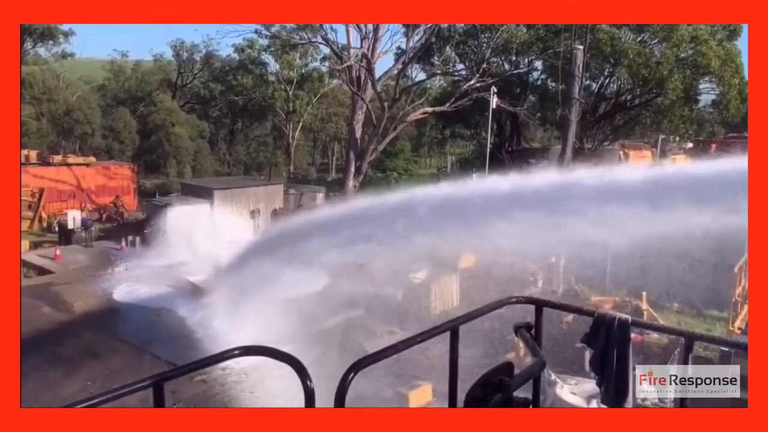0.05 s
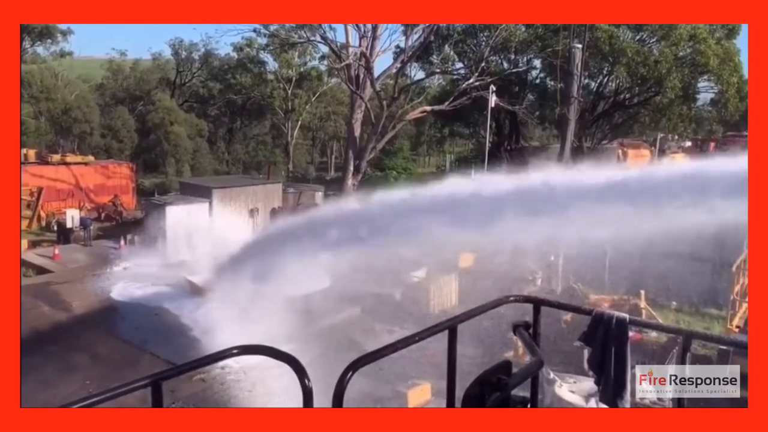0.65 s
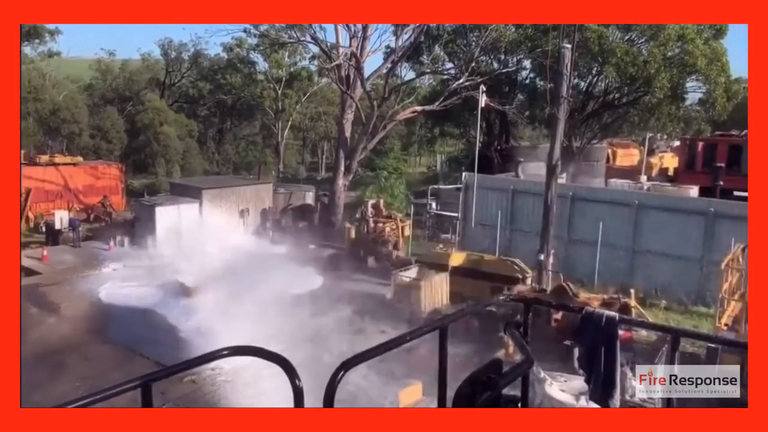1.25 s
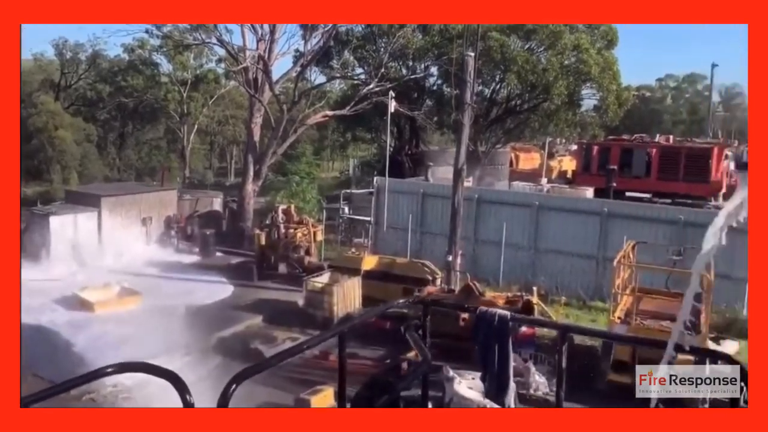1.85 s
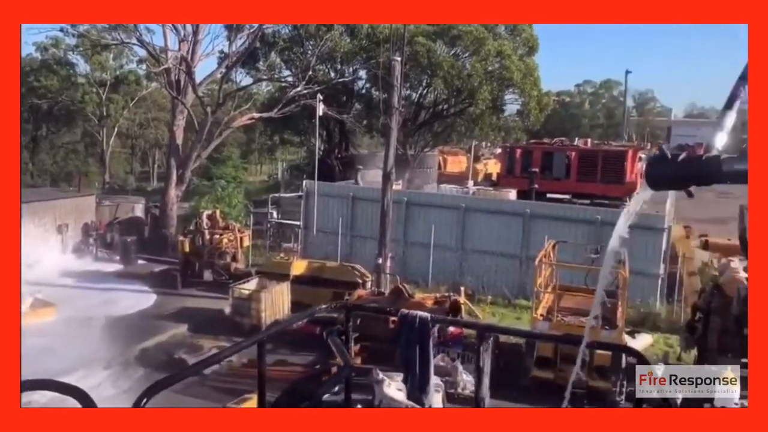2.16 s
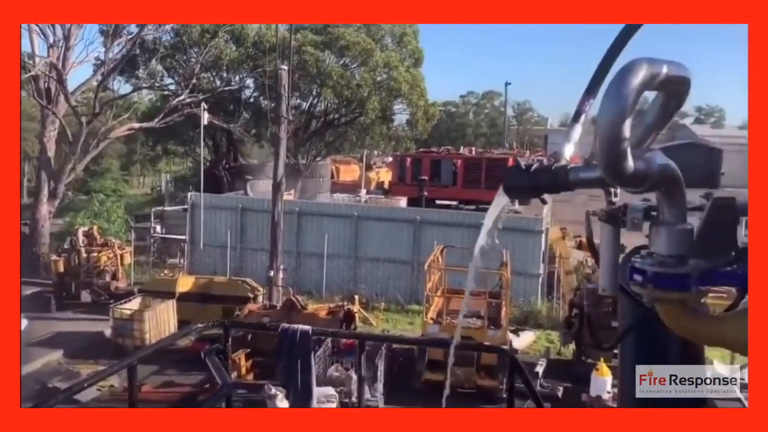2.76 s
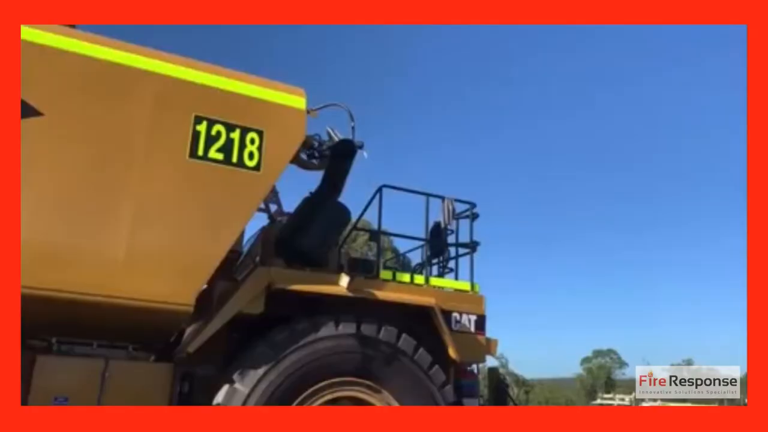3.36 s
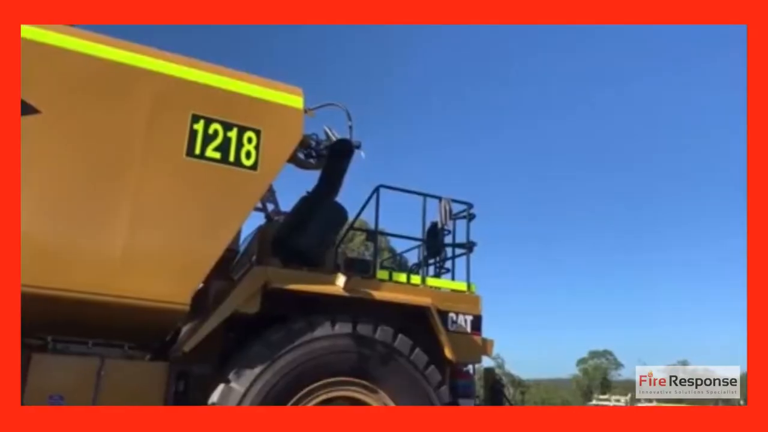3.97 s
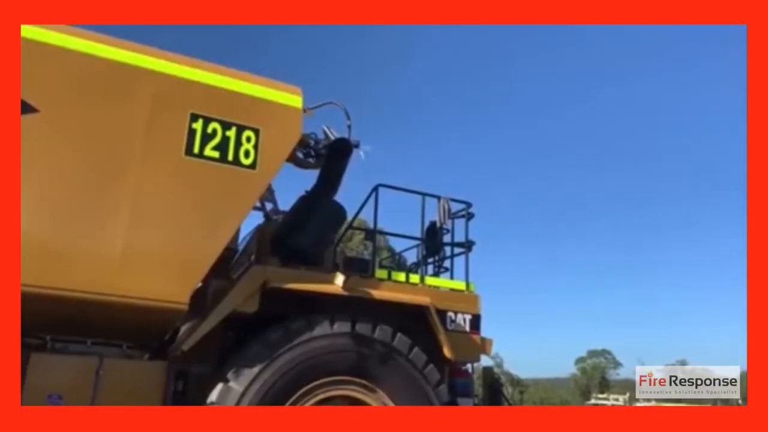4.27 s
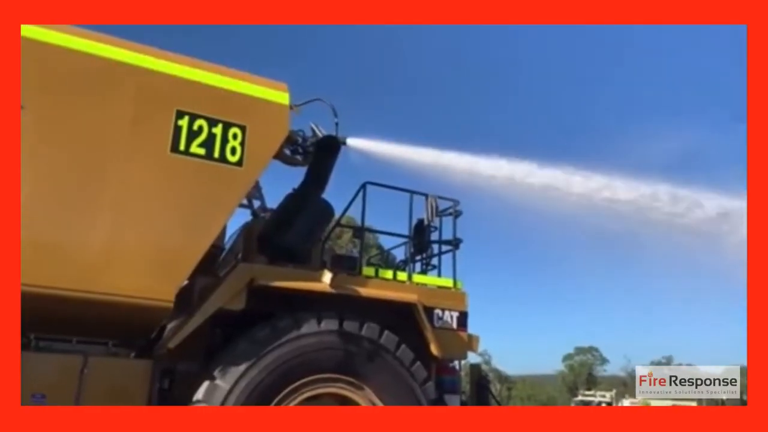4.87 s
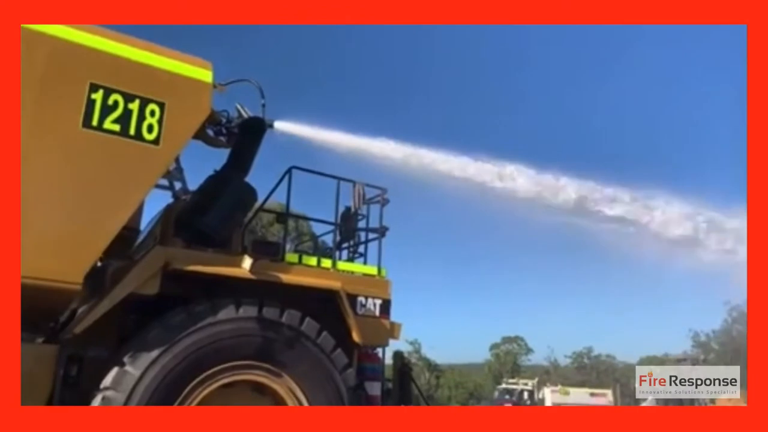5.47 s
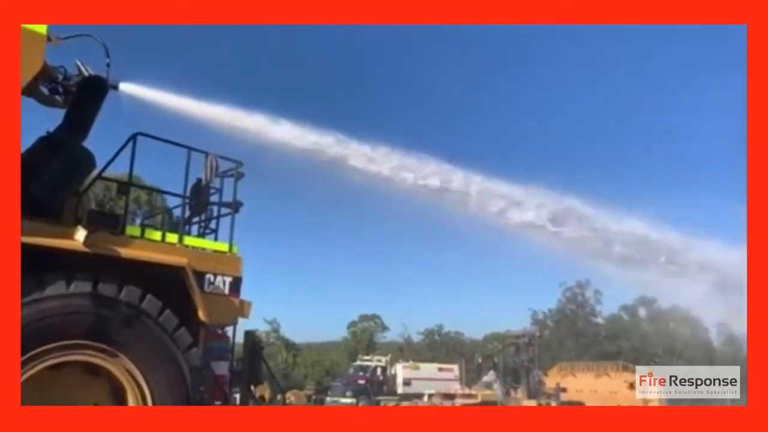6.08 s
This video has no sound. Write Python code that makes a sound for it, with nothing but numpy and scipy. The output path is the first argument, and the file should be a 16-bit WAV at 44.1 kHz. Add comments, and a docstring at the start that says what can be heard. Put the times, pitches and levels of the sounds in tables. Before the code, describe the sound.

A heavy diesel truck roars as its water cannon hisses, spits and dribbles away; after a break, the clattering engine runs and the jet restarts.

```python
"""A big diesel water truck works its cannon. Its exhaust drones at harmonics of the engine cycle,
combustion roars, and gear tones howl through the resonances of their case. Heard from the deck, the jet
hisses as it tears into drops, stops and spits air; the spray falls and thins to a dribble while the
engine winds down. After a brief break the truck is heard from the ground at full speed, clattering and
whistling; the valve opens, the pump takes load, slugs of water burst out and the jet starts again."""
import sys
import numpy as np
from scipy import signal
from scipy.fft import rfft, irfft
from scipy.io import wavfile
from scipy.ndimage import uniform_filter1d

SR = 44100
rng = np.random.default_rng(int(sys.argv[2]) if len(sys.argv) > 2 else 0)


def wav_record(signal):
    """Record a signal, one row per channel, as 16-bit PCM in the file named by sys.argv[1]."""
    frames = np.transpose(np.atleast_2d(signal))
    bounded = np.clip(frames, -1, 1)
    # unit amplitude maps onto the largest positive 16-bit level
    quanta = np.round(bounded * 32767).astype(np.int16)
    wavfile.write(sys.argv[1], SR, quanta)


N = 269451
TIME, BINS = np.arange(N) / SR, np.fft.rfftfreq(N, 1 / SR)

# engine tones, mostly exhaust harmonics, with gear whines at 42 and 77: (multiple of the cycle rate, relative
# level on deck [dB], on the ground [dB])
ENGINE_TONES = [(4, -23.3, -29.5), (5, -35.5, -38), (6, -30.5, -40), (7, -38.5, -44), (8, -33.5, -48),
                (9, -40, -35), (10, -36.5, -40), (11, -34.5, -42), (12, -27.5, -27.3), (13, -29, -30),
                (14, -22, -18.9), (15, -38, -39), (16, -36, -39), (17, -32, -42), (18, -34.5, -46),
                (20, -39.5, -50), (21, -45, -38), (25, -39.5, -50), (40, -38, -48), (42, -34, -37),
                (77, -34, -55)]
# spectrum of the roar as the engine winds down: (frequency [Hz], relative density [dB])
COASTING_SPECTRUM = [(25, -22), (55, -4), (120, -9), (155, 12), (200, -7), (235, 5), (300, -9.5), (620, -7),
                     (950, -10.5), (1300, -15.5), (1750, -17.5), (2800, -24.5), (5000, -45), (12000, -46.5)]
# stereo balance at each place: (frequency [Hz], left minus right [dB])
DECK_BALANCE = [(60, -5), (150, -4), (380, -7.5), (950, -2), (2380, 0), (5980, -1), (15000, 1)]
GROUND_BALANCE = [(60, -4.5), (150, -3.5), (380, 0), (950, 0.5), (2380, -1.5), (5980, -2), (15000, 1.5)]
# stereo coherence at each place: lead of the left side [s], then (frequency [Hz], correlation [0-1])
DECK_COHERENCE = (-.00023, [(60, 1), (260, 0.34), (500, 0.049), (1000, 0.87), (2000, 0.5), (4000, 0.26),
                  (9000, 0.023)])
GROUND_COHERENCE = (0.00013, [(60, .97), (260, 0.65), (500, 0.55), (1000, 0.93), (2000, 0.74), (4000, 0.21),
                    (8000, 0.51), (15000, 0.024)])
# the listener turns from the engine toward the jet: (time [s], share of the turn [0-1])
TURN_TO_JET = [(5.25, 0.12), (5.85, 0.57)]
DECK, GROUND = (DECK_COHERENCE, DECK_BALANCE), (GROUND_COHERENCE, GROUND_BALANCE)
THROTTLE_OFF_S, PUMP_LOAD_S = 1.31, 4.25
CYLINDERS = 12


def gain_of(db):
    """Amplitude ratio: a factor of ten for every 20 dB."""
    return 10 ** (np.asarray(db) / 20)


def unit_rms(x):
    """Normalisation to a mean power of 1."""
    return x / np.sqrt(np.mean(x ** 2) + 1e-20)


def curve(rows):
    """Linear interpolation of a time table at every sample."""
    return np.interp(TIME, *np.transpose(rows))


def at_frequency(rows, hz):
    """Interpolation of a spectrum table on a logarithmic frequency axis."""
    row_hz, value = np.transpose(rows)
    return np.interp(np.log(hz + 1), np.log(row_hz + 1), value)


def settle(start_s, time_s):
    """First-order relaxation from 0 to 1 with time constant time_s."""
    return 1 - np.exp(-np.maximum(TIME - start_s, 0) / time_s)


def bursts(rows):
    """Envelope of transients with exponential rise and decay."""
    return sum(gain_of(db) * np.exp(-abs(TIME - peak_s) / np.where(TIME < peak_s, rise_s, decay_s))
               for peak_s, db, rise_s, decay_s in rows)


def drift(hz):
    """Random fluctuation of rms 1: noise low-passed at hz."""
    return unit_rms(irfft(rfft(rng.standard_normal(N)) / (1 + (BINS / hz) ** 4), N))


def pan(balance, hz):
    """Constant-power panning: left and right gains at each frequency."""
    pair = gain_of(np.array([.5, -.5])[:, None] * at_frequency(balance, np.atleast_1d(hz)))
    return pair / np.sqrt(np.mean(pair ** 2, 0))


def coloured(white_pair, spectrum, place, band_hz=(0, SR)):
    """Spectral shaping to about rms 1 within the band; mid-side mixing sets the stereo coherence."""
    (lead_s, coherence), balance = place
    first, second = rfft(white_pair)
    correlation = np.clip(at_frequency(coherence, BINS), -.99, .99)
    mid, side = first * np.sqrt((1 + correlation) / 2), second * np.sqrt((1 - correlation) / 2)
    colour = gain_of(at_frequency(spectrum, BINS))
    colour /= np.sqrt(np.mean(colour ** 2 * (BINS > band_hz[0]) * (BINS < band_hz[1])))
    delay = np.exp(-2j * np.pi * BINS * lead_s)
    return irfft(np.array([mid + side, (mid - side) * delay]) * colour * pan(balance, BINS), N)


def crank(cycle_hz, hunting=.0006):
    """Phase as the integral of speed, in four-stroke cycles; the governor lets the speed hunt slightly."""
    return np.cumsum(cycle_hz * (1 + hunting * drift(5.5))) / SR


def tones(multiples, levels_db, cycles, balance, lead_s, waver, waver_hz, in_step=()):
    """Partials phase-locked to the crank; moving air modulates their amplitude and phase."""
    out, mean_cycle_hz = np.zeros((2, N)), (cycles[-1] - cycles[0]) * SR / N
    wobble = drift(waver_hz) + 1j * drift(waver_hz)
    for multiple, db in zip(multiples, levels_db):
        hz = multiple * mean_cycle_hz
        depth = waver * np.sqrt(hz / 500)  # short waves are disturbed more
        amplitude = gain_of(db) / np.sqrt(.5 + depth ** 2)
        start = rng.random() * (multiple not in in_step)  # harmonics in step add up to a chug
        modulation = 1 + depth * np.roll(wobble, rng.integers(N))
        partial = amplitude * np.exp(2j * np.pi * (multiple * cycles + start)) * modulation
        stereo = pan(balance, hz)[:, 0] * np.exp(1j * np.pi * hz * lead_s * np.array([1, -1]))
        out += (stereo[:, None] * partial).real
    return out


def deck_exhaust(cycles, cycle_hz, release):
    """Periodic firing makes a harmonic series, which slides through the pipe's resonances as it slows."""
    # resonant response of the exhaust pipe: (frequency [Hz], relative level [dB])
    pipe_response = [(42, -35), (60, -48), (82, -29), (134, -61), (151, -25), (168, -30), (185, -46),
                     (208, -44), (230, -25), (260, -44)]
    multiples, levels_db, _ = np.transpose(ENGINE_TONES)
    pulling = tones(multiples, levels_db, cycles, DECK_BALANCE,
                    lead_s=-.0001, waver=.13, waver_hz=4, in_step=(12, 14, 16))
    harmonics = np.arange(4, 27)
    sliding_db = (at_frequency(pipe_response, multiple * cycle_hz) for multiple in harmonics)
    coasting = tones(harmonics, sliding_db, cycles, DECK_BALANCE,
                     lead_s=-.0001, waver=.15, waver_hz=4, in_step=range(12, 18))
    return gain_of(-1) * pulling * (1 - release) + gain_of(-2.9) * coasting * settle(THROTTLE_OFF_S, .15)


def combustion(cycles, repeating_share, unevenness, size=4096):
    """Cyclostationary noise: unequal cylinders pulse a mix of a repeating pattern and fresh gas noise."""
    phase = cycles % 1
    pattern = signal.resample(rng.standard_normal((2, size)), 4 * size, axis=1)
    repeating = np.sqrt(repeating_share) * pattern[:, (phase * 4 * size).astype(int)]
    strength = np.exp(unevenness * rng.standard_normal(CYLINDERS))[(phase * CYLINDERS).astype(int)]
    puffs = strength * (1 + unevenness * np.cos(2 * np.pi * CYLINDERS * cycles))
    fresh = np.sqrt(1 - repeating_share) * rng.standard_normal((2, N))
    return unit_rms(puffs * (repeating + fresh))


def deck_roar(cycles, release, working_db=-21, coasting_db=-29.5):
    """Source and filter: combustion noise changes colour and weakens as the throttle eases off."""
    # spectrum of the roar under load: (frequency [Hz], relative density [dB])
    working_spectrum = [(25, -13), (50, -4), (125, -4), (170, 2.5), (235, 4.5), (300, -1.5), (430, -2),
                        (630, 4), (750, -5.5), (860, -1), (1600, -10), (2400, -14), (5000, -32.5),
                        (12000, -53)]
    drive = combustion(cycles, repeating_share=.44, unevenness=.17)
    working = coloured(drive, working_spectrum, DECK, band_hz=(400, 2500))
    coasting = coloured(drive, COASTING_SPECTRUM, DECK, band_hz=(400, 2500))
    level_db = working_db + (coasting_db - working_db) * settle(1.19, .58)
    return gain_of(level_db) * (working * (1 - release) + coasting * release)


def gear_case_db(hz, floor_db=-14):
    """Modal response of the gear case: its resonances add in power above a floor."""
    # modes of the case: (frequency [Hz], width [Hz], peak gain [dB])
    modes = [(112, 19, 1.5), (158, 16, -23), (216, 44, -1), (270, 18, -5), (331.3, 12, 0),
             (365.2, 11.3, 3.5), (410, 6.1, 2), (452, 21, 2.5), (533.6, 7.1, 0.5), (616, 66, 0),
             (1467, 52, -1.5), (1780, 41, -5), (2040, 150, -8)]
    power = sum(gain_of(db) ** 2 / (1 + ((hz - mode_hz) / width) ** 2) ** 2 for mode_hz, width, db in modes)
    return 10 * np.log10(gain_of(floor_db) ** 2 + power)


def gear_howl(cycles, cycle_hz, release, backlash_cycles=.0009):
    """Resonance swells each gear tone in turn as it slows; unloaded, backlash lets the teeth rattle."""
    # gear tones: (multiple of the cycle rate, relative level under load [dB], change when coasting [dB])
    gears = [(8.65, -31, -1), (16.8, -27, -7), (17.3, -36, 6), (23.6, -33, -4), (25.95, -32, 1),
             (33.6, -29.5, -2), (34.6, -41, 5), (43.25, -34.5, -6), (46, -43, 0), (49.5, -44, 5),
             (50.4, -36, 5), (51.4, -44, 7), (52.4, -44, 4), (154, -37, 2), (184.3, -42, 2)]
    shake = drift(hz=16)
    levels_db = []
    for multiple, db, change_db in gears:
        shake_db = 3.5 * (np.roll(shake, rng.integers(N)) - .4)
        levels_db.append(db + gear_case_db(multiple * cycle_hz) + release * (change_db + shake_db))
    rattling = cycles + backlash_cycles * release * drift(hz=22)
    return tones([row[0] for row in gears], levels_db, rattling, DECK_BALANCE,
                 lead_s=-.0001, waver=.15 + .3 * release, waver_hz=9)


def deck_engine(full_hz=13.685, cut_s=1.37, drop_hz=.75, coast_hz_per_s=2.3):
    """Frictional run-down: with the throttle cut, the speed drops quickly, then falls at a steady rate."""
    cycle_hz = full_hz - drop_hz * settle(cut_s, .3) - coast_hz_per_s * np.maximum(TIME - cut_s, 0)
    cycles, release = crank(cycle_hz), settle(THROTTLE_OFF_S, .24)
    return (deck_exhaust(cycles, cycle_hz, release) + deck_roar(cycles, release)
            + gain_of(-1.1) * gear_howl(cycles, cycle_hz, release))


def droplets(per_s, spread_db, drop_gain, flutter_db, size=256):
    """Shot noise of separate drops in a white hiss of mist, fluttering in patches of time and frequency."""
    sizes = gain_of(spread_db * np.minimum(rng.exponential(1, (2, N)), 4))
    drops = unit_rms(sizes * rng.standard_normal((2, N)) * (rng.random((2, N)) < per_s / SR))
    mist = rng.standard_normal((2, N))
    hz, _, bands = signal.stft(mist + drop_gain * drops, SR, nperseg=size)
    patches = uniform_filter1d(rng.standard_normal(bands.shape[1:]), 5, axis=0)
    patches = unit_rms(uniform_filter1d(patches, 10, axis=1))
    depth_db = flutter_db + 3 * np.minimum(hz / 9000, 1)[:, None] ** 2  # the finest spray is most fitful
    return unit_rms(signal.istft(bands * gain_of(depth_db * patches), nperseg=size)[1][:, :N])


def deck_jet(level_db=-31, shut_s=.7):
    """Jet break-up: water tearing into drops hisses until the valve shuts."""
    # spectrum of the jet close by: (frequency [Hz], relative density [dB])
    jet_spectrum = [(500, -18), (2000, 1), (4500, -12), (6000, -4), (8200, -1.5), (10500, -8.5),
                    (15500, -10)]
    hiss = droplets(per_s=1700, spread_db=3, drop_gain=.81, flutter_db=1)
    return gain_of(level_db) * (1 - settle(shut_s, .056)) * coloured(hiss, jet_spectrum, DECK)


def splatter(per_s, spread_db, top_hz, pitches=16, size=256):
    """Random impacts: each blob of water slaps the deck with a damped oscillation, left or right."""
    out = np.zeros((2, N))
    for hz in np.geomspace(1500, top_hz, pitches):
        periods = hz * np.arange(size) / SR
        slap = periods * np.exp(-periods / 9.3) * np.sin(2 * np.pi * periods)
        hits = rng.random((2, N)) < per_s / pitches / SR
        strengths = gain_of(spread_db * np.minimum(rng.exponential(1, (2, N)), 3))
        out += signal.oaconvolve(hits * strengths, slap[None], axes=1)[:, :N]
    return unit_rms(out)


def falling_spray(spray_db=-33.5, dribble_db=-40):
    """Impact noise: spray keeps landing after the jet stops, slops briefly and thins to a dribble."""
    # spectrum of the landing spray: (frequency [Hz], relative density [dB])
    spray_spectrum = [(500, -25), (2500, 6), (4500, 11), (6200, 6.5), (8300, 6), (11000, -8.5),
                      (15500, -13)]
    patter = coloured(droplets(per_s=930, spread_db=2.6, drop_gain=.18, flutter_db=1), spray_spectrum, DECK)
    slaps = gain_of(-8.5) * splatter(per_s=350, spread_db=7, top_hz=10940)
    slop_envelope = gain_of(-39) * settle(.85, .05) * (1 - settle(1.3, .2))
    slops = slop_envelope * splatter(per_s=130, spread_db=4, top_hz=4800)
    level_db = spray_db + (dribble_db - spray_db) * settle(1.31, .51)
    return gain_of(level_db) * (patter + slaps) + slops


def nozzle_spits():
    """Sudden expansion: pockets of air burst from the nozzle as the valve shuts."""
    # air pockets: (time [s], peak level [dB], rise [s], decay [s])
    pockets = [(.783, -28, .002, .05), (.792, -17, .002, .006), (.802, -21, .002, .007)]
    # spectrum of a spit: (frequency [Hz], relative density [dB])
    spit_spectrum = [(300, -10), (2000, 7), (4000, 3.5), (5500, 2), (8000, 3), (10500, -2), (15500, -4)]
    hiss = droplets(per_s=2200, spread_db=4.9, drop_gain=.29, flutter_db=.32)
    return bursts(pockets) * coloured(hiss, spit_spectrum, DECK)


def ground_exhaust(cycles, load, load_db=1):
    """Harmonics of the firing drone; neighbours in phase beat together, chugging once a cycle."""
    multiples, _, levels_db = np.transpose(ENGINE_TONES)
    loaded_db = (db + load_db * (load - .5) for db in levels_db)
    return tones(multiples, loaded_db, cycles, GROUND_BALANCE,
                 lead_s=.00025, waver=.15, waver_hz=4, in_step=(12, 13, 14))


def pump_whine(cycles, load):
    """Rotational tones of pump, fan and gears cross-fade from their dry to their loaded amplitudes."""
    # tones: (multiple of the cycle rate, level running dry [dB], change under load [dB])
    partials = [(8.65, -31, -5), (23.6, -55, 25), (24, -52, 18), (25.95, -30.5, -10), (40, -39, 3),
                (41, -37, 1), (43.25, -39, 1), (48.72, -32, -20), (51, -37, -3), (63, -41, 2),
                (69, -42, -3), (80, -50, 11), (87, -40, -5), (96, -40, -6), (154, -52, 6)]
    amplitudes = (gain_of(db) * (1 - load + gain_of(change_db) * load) for _, db, change_db in partials)
    levels_db = (20 * np.log10(amplitude + 1e-6) for amplitude in amplitudes)
    return tones([row[0] for row in partials], levels_db, cycles, GROUND_BALANCE,
                 lead_s=.0002, waver=.28, waver_hz=9)


def ground_roar(cycles):
    """Source and filter: combustion noise as it sounds beside the truck."""
    # spectrum of the roar: (frequency [Hz], relative density [dB])
    roar_spectrum = [(25, -22), (55, -17), (130, -3), (200, -1.5), (270, -3), (400, -7), (540, 1),
                     (730, -7.5), (830, -2), (980, -15.5), (1100, -8.5), (1600, -17), (2800, -20.5),
                     (6000, -47), (13000, -42.5)]
    drive = combustion(cycles, repeating_share=.41, unevenness=.077)
    return coloured(drive, roar_spectrum, GROUND, band_hz=(400, 2500))


def valve_clatter(cycles):
    """Nearly periodic excitation makes the valve gear clatter in narrow bands."""
    # spectrum of the clatter: (frequency [Hz], relative density [dB])
    clatter_spectrum = [(300, -55), (950, 7), (1100, 6.5), (1330, 4), (1500, 5), (1660, -12.5), (1800, 13),
                        (1870, -24), (1940, 8), (2200, -1.5), (2450, -0.5), (2800, -53), (6000, -46)]
    return coloured(combustion(cycles, repeating_share=.8, unevenness=.3), clatter_spectrum, GROUND)


def diesel_knock(cycles, decay_s=.002, spread_db=5):
    """Impulse excitation: each firing rings the block's modes, some cylinders much harder than others."""
    # modes of the engine block: (frequency [Hz], bandwidth [Hz], relative level [dB])
    modes = [(568, 43, -9.5), (950, 24, -4), (1263, 31, 2), (1776, 29, -12), (1913, 25, -2.5)]
    firing = np.floor(cycles * CYLINDERS).astype(int)
    strengths = gain_of(spread_db * rng.standard_normal(CYLINDERS))
    strikes = np.diff(firing, prepend=firing[0]) * strengths[firing % CYLINDERS]
    blows = signal.lfilter([1], [1, -np.exp(-1 / (decay_s * SR))], strikes) * rng.standard_normal((2, N))
    ringing = (gain_of(db) * unit_rms(signal.lfilter(*signal.iirpeak(hz, hz / width, fs=SR), blows))
               for hz, width, db in modes)
    return unit_rms(sum(ringing))


def air_hiss(level_db=-29.5):
    """Flow noise: air hisses steadily, with one puff before the valve opens."""
    # spectra of the hiss and of the puff: (frequency [Hz], relative density [dB])
    air_spectrum = [(1200, 0), (2600, 8.5), (3500, 3.5), (4400, 9.5), (5700, 0), (6200, 1.5), (6950, 9),
                    (7600, 1.5), (8200, 5), (8600, -4.5), (10500, -2), (13000, -16), (15500, -38)]
    puff_spectrum = [(1500, -26), (4500, -7), (6000, 19), (9000, -13), (15000, -19)]
    # the puff: (time [s], peak level [dB], rise [s], decay [s])
    puffs = [(3.165, -30.5, .1, .025)]
    hiss = droplets(per_s=1800, spread_db=2.3, drop_gain=.17, flutter_db=1)
    steady = gain_of(level_db) * coloured(hiss, air_spectrum, GROUND)
    return steady + bursts(puffs) * coloured(hiss[::-1], puff_spectrum, GROUND)


def whistles(cycles, load, edge_s=.06, dry_jitter_hz=6, loaded_jitter_hz=15):
    """Thin tones geared to the crank come and go; random modulation roughens them more under load."""
    # whistles: (multiple of the cycle rate, start [s], end [s], level [dB], slope [dB/s])
    spans = [(336.2, 3.25, 4.15, -38, -5), (336.2, 4.1, 4.38, -49, 0), (315.3, 3.3, 4, -52, 0),
             (315.3, 4.91, 5.34, -43.5, -5), (336.2, 4.5, 5.3, -50, 0), (336, 5.28, 6.2, -42, -8),
             (307, 4.68, 4.9, -48, 0), (307, 5.28, 6.2, -47, 0), (357, 4.9, 5.8, -52, 0)]
    jitter_hz = (dry_jitter_hz + (loaded_jitter_hz - dry_jitter_hz) * load) * drift(hz=70)
    phase = np.cumsum(jitter_hz) / SR - np.array([[0], [.18]])  # the right side lags
    flutter_db = (.8 + 1.7 * load) * drift(hz=14)
    out = np.zeros((2, N))
    for multiple, start_s, end_s, db, slope in spans:
        gate = np.clip(np.minimum(TIME - start_s, end_s - TIME) / edge_s, 0, 1)
        envelope = gate * gain_of(db + slope * (TIME - start_s) + flutter_db)
        out += envelope * np.sin(2 * np.pi * (multiple * cycles + phase))
    return np.sqrt(2) * out


def ground_engine(full_hz=13.52, sag_hz=.3, chug_s=3.165, dry_throb=.07, loaded_throb=.19):
    """Mechanical loading: as the pump takes up water, the speed sags and the throb deepens."""
    cycles = crank(full_hz - sag_hz * settle(PUMP_LOAD_S, .5))
    cycles -= np.interp(chug_s, TIME, cycles)  # one chug falls at chug_s
    load, turned = settle(PUMP_LOAD_S, .11), curve(TURN_TO_JET)
    exhaust = ground_exhaust(cycles, load)
    whine = gain_of(-9 * turned) * pump_whine(cycles, load)
    roar = gain_of(-22) * ground_roar(cycles)
    metal = gain_of(-26.5) * valve_clatter(cycles) + gain_of(-30.5) * diesel_knock(cycles)
    depth = dry_throb + (loaded_throb - dry_throb) * load
    throb = 1 + depth * np.cos(2 * np.pi * (cycles - .35))  # peaks .35 cycle after each chug
    throbbing = throb * (roar + gain_of(-14 * turned) * metal)
    return exhaust + whine + throbbing + air_hiss() + whistles(cycles, load)


def ground_jet(open_s=3.8):
    """Jet break-up high above: hiss grows, slugs burst out, and the nozzle rings as one turns to it."""
    # slugs of water: (time [s], peak level [dB], rise [s], decay [s])
    slugs = [(4.278, -13.5, 0.02, 0.026), (4.41, -26.5, 0.032, 0.088)]
    # spectra of the slugs, the distant jet and the nozzle's ring: (frequency [Hz], relative density [dB])
    slug_spectrum = [(80, -13), (250, 0), (370, 12), (600, -5), (800, 2.5), (1800, -7), (3400, -15),
                     (6000, -32), (15000, -27)]
    jet_spectrum = [(1000, -26), (2900, -19), (3400, 14), (3900, 3), (4100, 17), (4280, -1), (4450, 10),
                    (4700, 17), (5200, 13), (7000, -28), (10500, 8.5), (15500, 1)]
    ring_spectrum = [(2500, -28), (3100, -8), (3400, 3.5), (3750, -3), (4070, 0), (4300, -15), (5500, -9),
                     (8000, -22), (15000, -35)]
    slug_noise = droplets(per_s=600, spread_db=2, drop_gain=.62, flutter_db=1.7)
    jet_noise = droplets(per_s=1200, spread_db=3.4, drop_gain=.27, flutter_db=3.2)
    ring_noise = droplets(per_s=1200, spread_db=3.5, drop_gain=.3, flutter_db=3.4)
    turned = curve(TURN_TO_JET)
    jet = gain_of(-40.5 - 2 * turned) * settle(open_s, .52) * coloured(jet_noise, jet_spectrum, GROUND)
    ring = gain_of(-29) * turned * coloured(ring_noise, ring_spectrum, GROUND)
    return jet + bursts(slugs) * coloured(slug_noise, slug_spectrum, GROUND) + ring


def scene():
    """Superposition of the sources on deck, then on the ground; a faint steady rush fills the break."""
    # fades of the two places: (time [s], gain [0-1])
    deck_fade = [(0, 1), (3.005, 1), (3.025, .25), (3.042, 0)]
    ground_fade = [(3.07, 0), (3.088, .03), (3.09, 1)]
    rush = gain_of(-54) * coloured(rng.standard_normal((2, N)), COASTING_SPECTRUM, DECK)
    on_deck = deck_engine() + deck_jet() + falling_spray() + nozzle_spits()
    on_ground = ground_engine() + ground_jet()
    return on_deck * curve(deck_fade) + on_ground * curve(ground_fade) + rush


def record(dry, ceiling=.9, cutoff_hz=15800):
    """Soft saturation rounds off the highest peaks; a low-pass filter then limits the band."""
    rounded = dry / (1 + (dry / ceiling) ** 6) ** (1 / 6)
    low_pass = signal.firwin(511, cutoff_hz, window=("kaiser", 9), fs=SR)
    return signal.oaconvolve(rounded, low_pass[None], "same")


dry = scene()
out = record(dry)
wav_record(out)
```